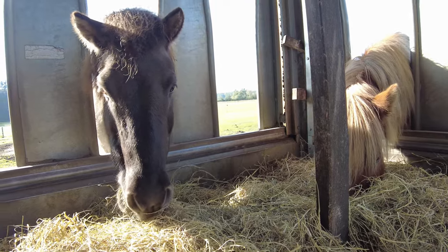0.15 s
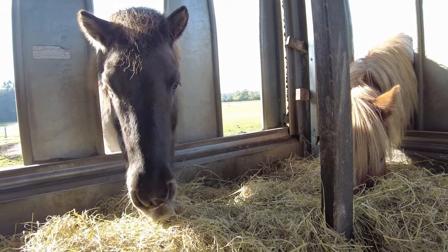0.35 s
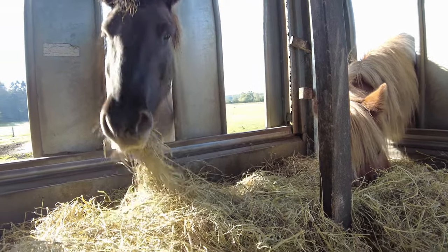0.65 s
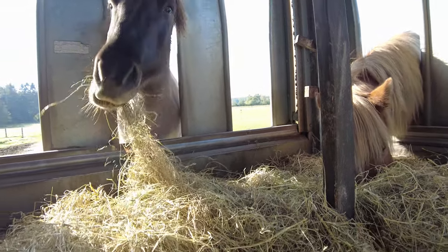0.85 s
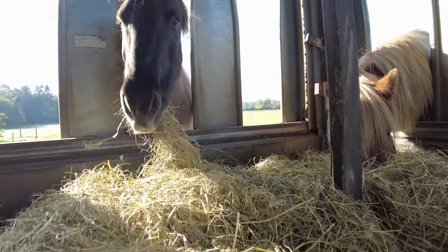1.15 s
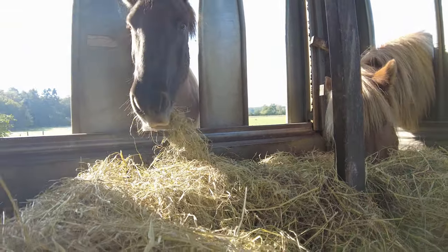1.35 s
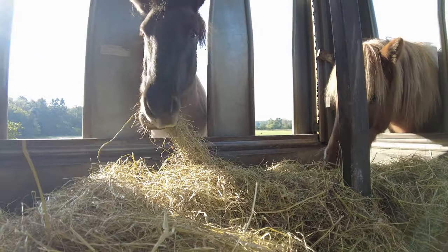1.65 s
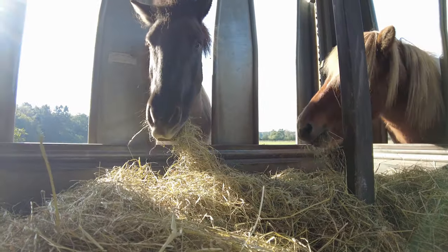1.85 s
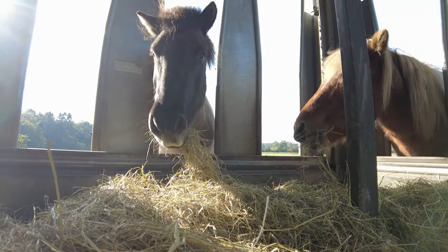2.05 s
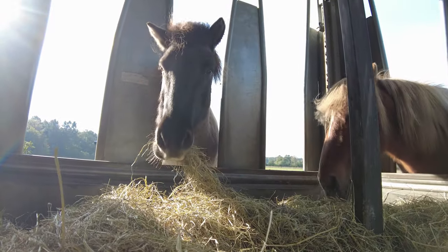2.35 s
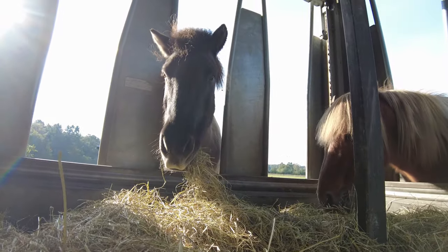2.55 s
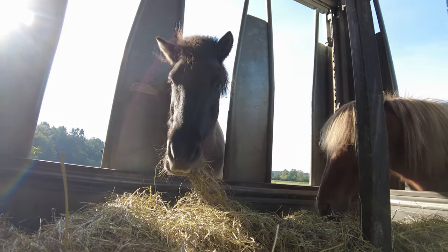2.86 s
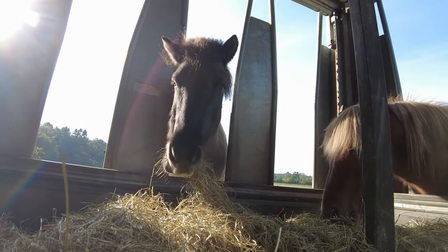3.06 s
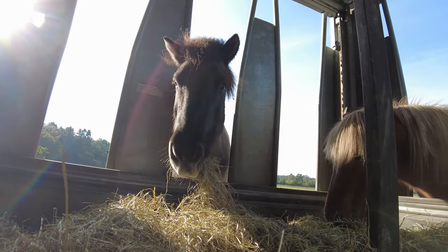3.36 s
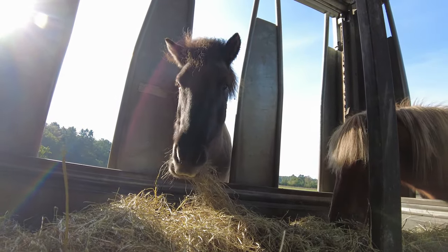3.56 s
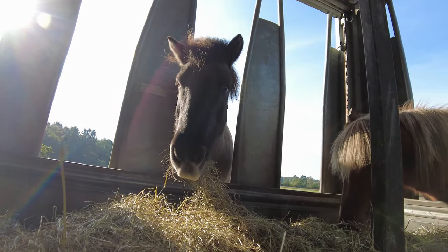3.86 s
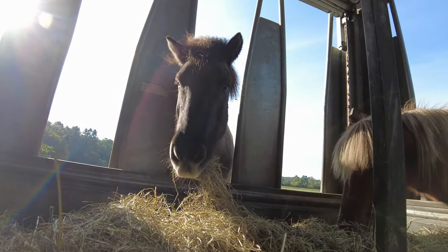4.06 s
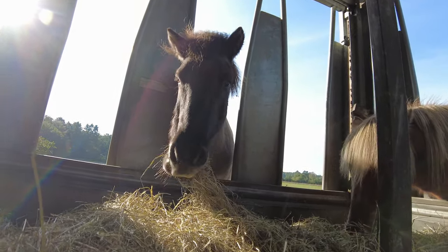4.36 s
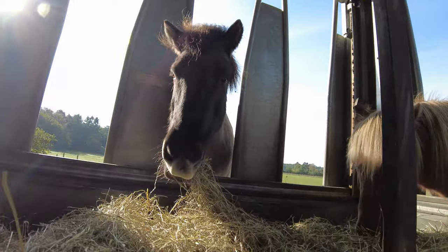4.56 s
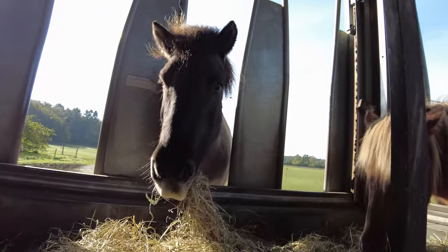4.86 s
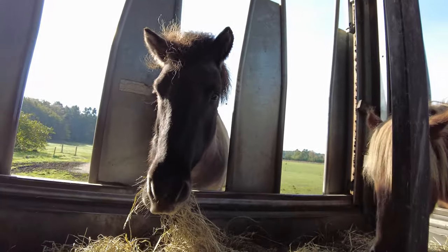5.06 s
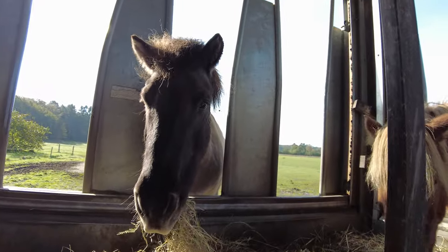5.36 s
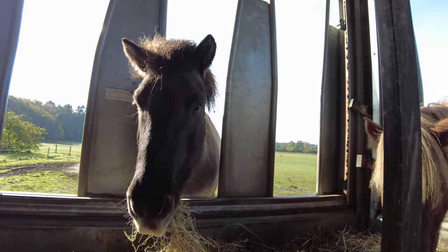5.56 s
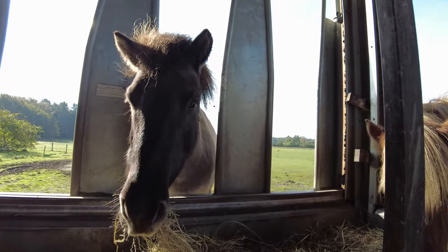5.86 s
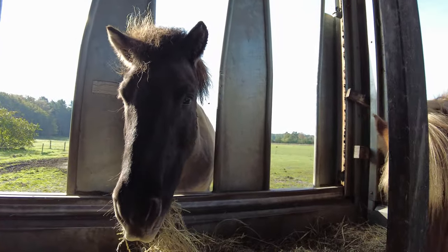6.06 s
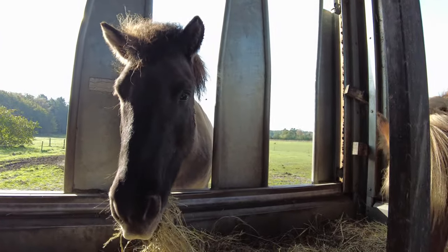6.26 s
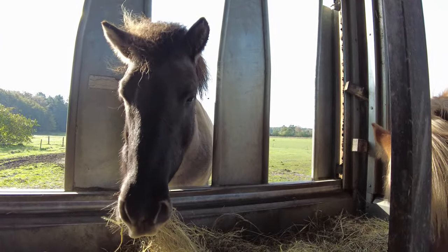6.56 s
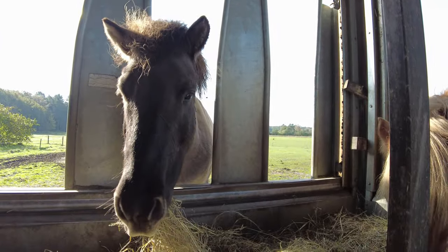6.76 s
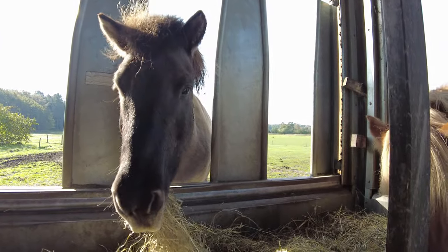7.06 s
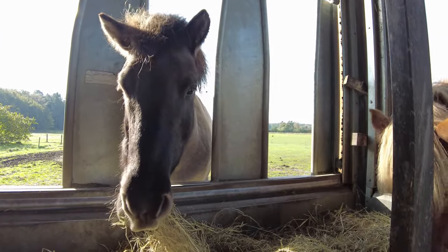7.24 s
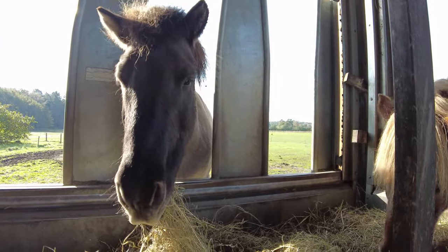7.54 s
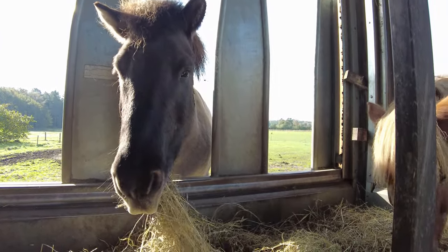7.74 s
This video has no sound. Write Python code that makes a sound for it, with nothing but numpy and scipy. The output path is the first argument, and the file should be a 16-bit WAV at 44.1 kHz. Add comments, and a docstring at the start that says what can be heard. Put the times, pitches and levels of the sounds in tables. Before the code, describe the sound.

Horses chew hay close to the microphone at a steel feeder outdoors. From the start and for about eight seconds, their jaws work at roughly four slightly uneven strokes a second. Each stroke combines a dull, hollow thud of molars with a gritty crunch, while dry stalks snap and loose hay rustles softly underneath. Light wind rumbles on the microphone, swelling around 0.5 seconds and easing by 2 seconds. From about 1 second, occasional soft mouth pops and tiny straw ticks join in, along with a few faint, thin bird chirps far away. A heavier chewing thud lands at about 4.6 seconds, followed by the loudest stalk snap near 5 seconds. The grinding carries on, with another heavy thud and a cluster of snaps around 7.5 seconds. The steel panels give the snaps a very short echo.

```python
"""Horses chew hay at a steel feeder in the open. From the start, about four jaw strokes a second:
molars slip and thud through the skull, stalks crunch and snap, loose hay rustles. Light wind on the
two microphone ports swells at 0.5 s and eases by 2 s. From 1 s on, mouths pop, dry straws tick and
faint far chirps pass. The heaviest thuds fall at 4.6 s and 7.5 s, the loudest snap between, near 5 s.
Throughout, the steel panels add short echoes."""
import sys
import numpy as np
from scipy import signal
from scipy.io import wavfile
from scipy.ndimage import uniform_filter1d

SR = 44100
rng = np.random.default_rng(int(sys.argv[2]) if len(sys.argv) > 2 else 0)


def store_pcm(level_fs):
    """Save levels as 16-bit WAV."""
    pcm = np.round(np.clip(level_fs, -1, 1) * 32767).astype(np.int16)
    wavfile.write(sys.argv[1], SR, np.atleast_2d(pcm).T)


N = 348390

# jaw strokes: t/s, rise/s, fall/s, skull/dB, dull crunch/dB, mid crunch/dB, bright crunch/dB,
# throat hollow/Hz, jaw rumble/dB, swish of hanging hay/dB
JAW_STROKES = [(0.01, 0.044, 0.013, -59, -42, -63, -65, 530, -42, -76),
               (0.22, 0.077, 0.095, -39.5, -64, -55, -60, 696, -59, -86),
               (0.36, 0.079, 0.12, -32.5, -43.5, -48, -50.5, 680, -54, -84),
               (0.59, 0.034, 0.023, -40, -48.5, -52, -53, 610, -39, -72),
               (0.8, 0.18, 0.14, -43, -76, -81, -72, 660, -50, -66),
               (1.07, 0.097, 0.08, -32.5, -56, -51, -55, 450.0, -65, -74),
               (1.25, 0.071, 0.12, -42, -56, -56.5, -55.5, 553, -53, -83),
               (1.38, 0.037, 0.1, -39, -48, -55.5, -56.5, 407, -49, -84),
               (1.49, 0.031, 0.025, -32, -57, -58, -60, 407, -48, -72),
               (1.69, 0.12, 0.084, -45, -45.5, -55, -57.5, 440, -66, -77),
               (1.87, 0.17, 0.14, -31.5, -48.5, -60.5, -59, 457, -51, -72),
               (2.1, 0.029, 0.093, -41, -49, -63, -66, 476, -61, -79),
               (2.48, 0.12, 0.13, -30.5, -45.5, -58, -55.5, 486, -48.5, -80),
               (2.8, 0.087, 0.077, -39.5, -46.5, -69, -64, 447, -49, -77),
               (3.18, 0.11, 0.086, -32.5, -43.5, -65, -56, 494, -51, -82),
               (3.54, 0.16, 0.082, -42, -50.5, -75, -66, 434, -53, -82),
               (3.86, 0.1, 0.082, -30.5, -42, -56, -50.5, 530, -48, -75),
               (4.06, 0.041, 0.049, -42, -55, -74, -62, 517, -63, -68),
               (4.22, 0.066, 0.13, -35.5, -54.5, -58.5, -66, 435, -46, -78),
               (4.48, 0.12, 0.11, -43, -53, -61.5, -63, 474, -65, -74),
               (4.63, 0.14, 0.054, -30, -55, -52, -58.5, 480, -45, -68),
               (4.95, 0.13, 0.12, -36.5, -56, -54.5, -59, 640, -63, -86),
               (5.31, 0.19, 0.1, -38, -50, -51.5, -61, 690, -63, -74),
               (5.63, 0.081, 0.066, -37.5, -45, -51.5, -55.5, 625, -48, -70),
               (5.99, 0.14, 0.11, -37, -47.5, -53.5, -59.5, 690, -45.5, -70),
               (6.28, 0.21, 0.2, -42, -55.5, -57, -64, 533, -48.5, -72),
               (6.56, 0.08, 0.064, -45, -56, -60, -79, 500.0, -56, -72),
               (6.79, 0.16, 0.22, -38, -47, -54, -56, 660.0, -44, -76),
               (7.2, 0.2, 0.13, -45, -53, -54.5, -70, 527, -62, -68),
               (7.49, 0.12, 0.078, -34.5, -48, -56, -57.5, 560, -50, -83),
               (7.64, 0.04, 0.05, -40, -49.5, -58, -66, 610.0, -54, -72),
               (7.82, 0.039, 0.061, -60, -46.5, -49, -64, 630, -57, -72)]
# stalks breaking: t/s, peak/dB, tilt/(dB/octave), mouth ring/Hz, t60/s
STALK_BREAKS = [(0.289, -34.5, 1, 1410, 0.03), (0.319, -31.5, 2, 717, 0.046), (0.374, -34, 2, 630, 0.026),
                (0.399, -35, 2, 640, 0.035), (0.578, -47, 2, 664, 0.03), (0.952, -38, 2, 1920, 0.033),
                (1.021, -46, 3, 1570, 0.031), (1.079, -40, -4, 1400, 0.027), (1.121, -41, 3.5, 1230, 0.035),
                (1.365, -35, 0, 1390, 0.035), (1.697, -37, 1.5, 1450, 0.035),
                (2.088, -33, -0.5, 800, 0.038), (2.375, -39.5, 4.5, 638, 0.032),
                (2.417, -40, 1.5, 626, 0.044), (2.431, -38, 5, 650, 0.031), (2.493, -31, 2, 626, 0.019),
                (2.53, -38, 2, 676, 0.035), (2.811, -37.5, 2.5, 1520, 0.035), (3.099, -41, 2.5, 813, 0.035),
                (3.183, -41, 4, 760, 0.045), (3.246, -37, -0.5, 775, 0.039), (3.486, -38, -1.5, 890, 0.044),
                (3.812, -34, 0.5, 630, 0.029), (4.216, -33.5, 1, 1390, 0.032),
                (4.433, -35.5, -4, 670, 0.035), (4.519, -45.5, 5, 1320, 0.035),
                (4.562, -40, 3, 1430, 0.039), (4.622, -34.5, 4.5, 1250, 0.032),
                (4.659, -40, 7, 1070, 0.029), (4.863, -45, 2, 1000, 0.031), (4.95, -22, -1.5, 850, 0.02),
                (5.214, -30.5, -2, 1420, 0.039), (5.278, -37.5, 1.5, 1420, 0.035),
                (5.307, -39, 5, 1270, 0.052), (5.327, -28.5, 2, 660, 0.033), (5.38, -35.5, 3, 705, 0.025),
                (5.915, -34, 1.5, 646, 0.041), (5.984, -30, 3, 1390, 0.035), (6.219, -38.5, 1, 745, 0.055),
                (6.503, -38, 0.5, 785, 0.039), (6.579, -35, -1, 1260, 0.05), (6.736, -39, 3, 708, 0.044),
                (6.774, -36.5, 3, 1340, 0.035), (7.091, -34, -0.5, 1300, 0.042),
                (7.138, -40, -1, 1300, 0.032), (7.198, -30, -1, 1510, 0.037), (7.276, -37, 3, 830, 0.037),
                (7.428, -31.5, -1, 790, 0.033), (7.448, -36, 1.5, 790, 0.03),
                (7.49, -33.5, 2.5, 1290, 0.035), (7.518, -30.5, 0, 1260, 0.042),
                (7.619, -40, 3, 780, 0.055), (7.738, -38, 3.5, 1260, 0.038), (7.81, -35, -2, 1430, 0.035),
                (7.827, -37, 1, 1280, 0.042)]
# spectrum of wind eddies and jaw rumble: f/Hz, level/dB
LOW_SPECTRUM = [(30, -27), (60, 15.5), (80, 3.5), (120, -1.5), (160, -5), (300, -48.5)]


def grinding():
    """Small slips ring the skull; crushed stalks crunch through the hollows of the moving mouth."""
    skull_modes = [(238.1, 57.3, -1), (255.6, 31.4, -0.5), (279.9, 41.6, -1)]  # f/Hz, width/Hz, level/dB
    dull_spectrum = [(60, -12), (150, -19), (380, 1), (600, -11.5), (850, -6), (1100, -15), (1500, -44.5)]  # f/Hz, level/dB
    bright_spectrum = [(1300, -13), (1800, 21), (2600, 6), (3100, 11.5), (4200, -2.5), (7000, -23),
                       (12000, -45)]  # f/Hz, level/dB
    floors_db = [-47.5, -59, -74.5, -78]  # between strokes: skull/dB, dull/dB, mid/dB, bright/dB
    lips_open_hz, lips_shut_hz = 2920, 2590  # hollow behind the lips
    times_s, _, _, *levels_db, hollow_hz, rumble_db, _ = np.transpose(JAW_STROKES)
    throat_hz = np.interp(np.arange(N) / SR, times_s, hollow_hz)
    closure = np.minimum(jaw_gain(np.zeros(len(times_s)), -60), 1)
    lips_hz = lips_open_hz + (lips_shut_hz - lips_open_hz) * closure
    slips = crackle(250, 0.42, 0.58, 0.0025)
    skull = np.zeros(N)
    for hz, width_hz, db in skull_modes:
        band = signal.butter(2, [hz - width_hz / 2, hz + width_hz / 2], "bandpass", fs=SR, output="sos")
        skull += gain_of(db) * signal.sosfilt(band, slips * flutter(30, 1.6))
    pressure = flutter(14.7, 2.55) * sticking()
    dull = coloured(crackle(200, 2.4, 0.92, 0.0092) * pressure, dull_spectrum)
    dull += gain_of(6.5) * resonate(dull, throat_hz * flutter(19, 1), width_hz=66)
    mid = crackle(90, 1, 1, 0.0037) * pressure
    mid = resonate(mid, 1330 * flutter(9.3, 0.67), width_hz=160)
    mid = resonate(mid, 1500, width_hz=600)
    bright = coloured(crackle(200, 2.4, 0.8, 0.002) * pressure, bright_spectrum)
    bright += gain_of(7.5) * resonate(bright, lips_hz * flutter(29, 0.57), width_hz=210)
    out = jaw_gain(rumble_db, -92) * unit_rms(coloured(slips, LOW_SPECTRUM))
    for db, floor_db, layer in zip(levels_db, floors_db, (skull, dull, mid, bright)):
        out += jaw_gain(db, floor_db) * unit_rms(layer)
    return out


def jaw_gain(levels_db, floor_db):
    """Each stroke builds, holds and lets go at its own level; powers add over a steady floor."""
    ends_db, squareness = -10, 1.87
    peak_s, rise_s, fall_s = np.transpose(JAW_STROKES)[:3, :, None]
    t = np.arange(0, N + 64, 64) / SR
    from_peak = np.where(t < peak_s, (peak_s - t) / rise_s, (t - peak_s) / fall_s)
    pressure = gain_of(ends_db * np.minimum(from_peak, 5) ** squareness)
    power = gain_of(floor_db) ** 2 + ((gain_of(levels_db)[:, None] * pressure) ** 2).sum(0)
    return np.interp(np.arange(N) / SR, t, np.sqrt(power))


def sticking():
    """Teeth stick on a stalk just before it breaks: the crunch gain dips."""
    hush_db, dip_db = np.zeros(N), np.linspace(0, -7, 600)
    for s, *_ in STALK_BREAKS:
        add(hush_db, s - len(dip_db) / SR, dip_db)
    return gain_of(uniform_filter1d(hush_db, size=40))


def molar_thuds():
    """Each strong slip rings the skull briefly, over a low push of the jaw."""
    strong_slips = [(0.202, -24.5, 277, 0.11), (0.255, -27, 262, 0.065), (0.296, -27.5, 266, 0.036),
                    (0.323, -19.5, 223.5, 0.2), (0.374, -21, 274, 0.086), (0.404, -30, 261, 0.12),
                    (0.424, -21.5, 246, 0.082), (0.774, -36, 286, 0.13), (0.81, -30, 278, 0.12),
                    (0.954, -27.5, 254, 0.084), (1.063, -33.5, 245, 0.081), (1.122, -17.5, 250, 0.1),
                    (1.224, -25.5, 231, 0.037), (1.361, -28.5, 314, 0.073), (1.48, -25, 279, 0.06),
                    (1.627, -32, 282, 0.094), (1.709, -24, 278, 0.059), (1.769, -24.5, 292, 0.15),
                    (1.82, -20.5, 264, 0.093), (1.899, -32, 270, 0.065), (1.943, -22, 269, 0.095),
                    (1.978, -30, 254, 0.048), (2.097, -26.5, 307, 0.032), (2.367, -28.5, 271, 0.098),
                    (2.392, -26.5, 280, 0.08), (2.44, -19.5, 272, 0.04), (2.476, -20, 257, 0.074),
                    (2.489, -16, 274, 0.032), (2.554, -21.5, 270, 0.052), (2.661, -31, 240, 0.042),
                    (2.731, -29, 234, 0.086), (2.765, -28.5, 293, 0.049), (2.829, -29.5, 273, 0.054),
                    (3.088, -31.5, 239, 0.11), (3.148, -19, 233, 0.054), (3.192, -20, 272, 0.049),
                    (3.248, -23.5, 266, 0.075), (3.585, -28.5, 214.4, 0.14), (3.773, -24.5, 217, 0.16),
                    (3.831, -22, 214, 0.056), (3.842, -21.5, 258, 0.028), (3.888, -17, 302, 0.048),
                    (3.943, -17.5, 235, 0.035), (4.053, -30.5, 256, 0.04), (4.22, -22, 224, 0.084),
                    (4.436, -24.5, 242, 0.15), (4.523, -26.5, 248, 0.046), (4.549, -29, 228, 0.11),
                    (4.622, -18, 256, 0.076), (4.636, -11, 234, 0.051), (4.661, -19, 238, 0.037),
                    (4.757, -32.5, 282, 0.056), (4.916, -23.5, 283, 0.057), (4.983, -30, 279, 0.072),
                    (5.233, -27.5, 234, 0.15), (5.29, -20, 240, 0.11), (5.328, -20.5, 238, 0.074),
                    (5.378, -27.5, 220, 0.065), (5.591, -32, 240, 0.076), (5.926, -22.5, 244, 0.077),
                    (6.021, -18, 243, 0.071), (6.077, -21, 220, 0.046), (6.328, -32.5, 275, 0.065),
                    (6.586, -28, 293, 0.083), (6.69, -22.5, 245, 0.082), (6.749, -26, 231, 0.061),
                    (6.779, -23.5, 217, 0.073), (6.928, -32, 221, 0.073), (7.276, -26, 262, 0.081),
                    (7.4, -30, 260, 0.088), (7.435, -24, 269, 0.071), (7.489, -19, 258, 0.041),
                    (7.521, -9.5, 231, 0.065), (7.548, -21, 220, 0.053), (7.617, -30.5, 231, 0.072),
                    (7.814, -32, 305, 0.039)]  # t/s, level/dB, ring/Hz, t60/s
    skull_response = [(60, -3.5), (120, 1.5), (165, -12.5), (205, -1.5), (300, 0.5), (360, -7.5), (600, 1)]  # f/Hz, gain/dB
    out, t = np.zeros(N), np.arange(8000) / SR
    push = gain_of(-19) * np.sin(2 * np.pi * 115 * t) * gain_of(-60 * t / 0.051)
    for s, db, hz, t60_s in strong_slips:
        ring = soft_decay(t, 0.0013, t60_s) * np.sin(2 * np.pi * (hz * t + rng.random()))
        add(out, s, gain_of(db) * (ring + push))
    return coloured(out, skull_response)


def stalk_snaps():
    """Each break is a tick and a burst of tearing fibres, ringing briefly in the mouth."""
    stalk_spectrum = [(300, 1.5), (550, 0.5), (750, 1), (1080, -8.5), (1300, 1), (1700, -12.5), (2500, -6),
                      (3200, -14.5), (4500, -19.5), (9000, -42)]  # f/Hz, level/dB
    out, t = np.zeros(N), np.arange(4000) / SR
    tick = -1.31 * np.exp(-t / 0.0002)
    for s, db, tilt_db, hz, t60_s in STALK_BREAKS:
        spectrum = [(f, level + tilt_db * np.log2(f / 1000)) for f, level in stalk_spectrum]
        fibres = np.sign(rng.standard_normal(len(t)))
        tear = fibres * gain_of(-60 * t / t60_s) * (1 - np.exp(-t / 0.0024))
        snap = coloured(tear + tick, spectrum)
        snap += gain_of(8) * resonate(snap, hz, width_hz=80)
        envelope_peak = np.sqrt(2 * uniform_filter1d(snap ** 2, size=130).max())
        add(out, s, gain_of(db) * snap / envelope_peak)
    return out


def mouth_pops():
    """Soft, short rings of the mouth hollow."""
    pops = [(1.059, -36, 379), (1.371, -33, 408), (1.475, -38, 385), (1.694, -36, 371), (1.85, -46, 444),
            (2.092, -30.5, 378), (2.488, -33.5, 431), (2.809, -41.5, 366), (3.246, -38.5, 398),
            (3.498, -36.5, 419), (5.649, -47, 409), (7.114, -40, 400), (7.827, -43, 450)]  # t/s, peak/dB, f/Hz
    out, t = np.zeros(N), np.arange(6000) / SR
    envelope = soft_decay(t, rise_s=0.0026, t60_s=0.06)
    for s, db, hz in pops:
        add(out, s, gain_of(db) * envelope * np.sin(2 * np.pi * hz * t))
    return out


def hay_rustle():
    """Dry stalks rub: fine hiss stirred by each stroke, brighter fizz from hay pulled close by."""
    sliding = [(0.0, -63.5, -68), (0.4, -61.5, -70), (0.77, -60, -54.5), (0.99, -62, -72),
               (1.1, -59.5, -65.5), (1.34, -63, -74), (1.61, -61, -58), (1.91, -62.5, -65.5),
               (2.11, -65, -70), (2.77, -67.5, -73.5), (3.06, -66, -75), (3.14, -64, -69), (3.43, -67, -75),
               (3.61, -66, -70.5), (3.74, -70.5, -82), (3.85, -63, -71), (3.94, -64.5, -71.5),
               (4.49, -67.5, -73), (4.62, -64, -75), (4.8, -65.5, -72.5), (5.96, -62.5, -72),
               (6.14, -65, -72), (6.58, -62.5, -63.5), (7.0, -63.5, -72), (7.22, -63.5, -63),
               (7.44, -60.5, -60), (7.77, -63, -63), (7.9, -63, -71)]  # t/s, hiss/dB, fizz/dB
    hiss_spectrum = [(400, 2), (800, 7.5), (1150, 4.5), (1300, 12), (2000, 4), (3000, 4.5), (5000, 1.5),
                     (7000, -5.5), (8000, -8), (10000, -17), (16000, -21)]  # f/Hz, level/dB
    fizz_spectrum = [(2500, -21.5), (4000, -5), (6000, 0.5), (8000, 0.5), (10000, -1), (12000, -4.5),
                     (14500, -5), (15800, -21)]  # f/Hz, level/dB
    hiss_db, fizz_db = curves(sliding)
    swish_db = np.transpose(JAW_STROKES)[-1]
    stir = jaw_gain(np.full(len(JAW_STROKES), -2.5), floor_db=0)
    hiss = unit_rms(coloured(crackle(380, 2, 4.2, 0.00066), hiss_spectrum))
    hiss *= gain_of(hiss_db + 5) * stir
    fizz = unit_rms(coloured(crackle(380, 2.3, 8.4, 0.00082), fizz_spectrum))
    fizz *= np.hypot(gain_of(fizz_db), jaw_gain(swish_db, floor_db=-88))
    return flutter(4.5, 0.15) * (hiss + fizz)


def straw_ticks():
    """Dry straws tick, each a very short high ring."""
    ticks = [(1.3274, -50, 5070), (1.3982, -51, 5460), (2.2373, -49, 5560), (2.3047, -55, 6390),
             (2.7576, -54, 6160), (3.3233, -52, 5400), (3.3424, -50, 5390), (4.8075, -49, 6090),
             (6.6912, -49, 9350), (7.877, -53, 7990)]  # t/s, peak/dB, f/Hz
    t60_s = 0.0082
    out, t = np.zeros(N), np.arange(400) / SR
    for s, db, hz in ticks:
        add(out, s, gain_of(db - 60 * t / t60_s) * np.sin(2 * np.pi * hz * t))
    return out


def wind():
    """Wind on the ports: lumpy rumble under the flapping of quicker eddies."""
    gusts = [(0.0, -53, -52), (0.48, -41.5, -45), (0.88, -45, -56), (1.43, -40, -47), (1.63, -42.5, -51),
             (2.24, -51, -55), (2.62, -53, -52.5), (3.17, -59, -49.5), (3.65, -44.5, -49),
             (4.16, -53.5, -51.5), (4.66, -48, -49), (6.47, -54, -55.5), (6.78, -57, -46.5),
             (7.08, -50, -49.5), (7.5, -56, -52), (7.9, -59, -58)]  # t/s, rumble/dB, flapping/dB
    gust_spectrum = [(12, -17), (20, 11), (32, 25), (45, 14), (60, -2.5), (90, -39.5)]  # f/Hz, level/dB
    rumble_db, flapping_db = curves(gusts)
    rumble = unit_rms(coloured(rng.standard_normal(N) * flutter(16, 1.4), gust_spectrum))
    flapping = unit_rms(coloured(crackle(40, 4.4, 1, 0.002), LOW_SPECTRUM))
    return gain_of(rumble_db) * rumble + gain_of(flapping_db) * flapping


def far_chirps():
    """Thin, husky whistles: noise in a gliding resonance."""
    chirps = [(1.017, 0.035, 3150, 2980, -51.5), (1.724, 0.06, 4360, 3430, -58),
              (2.013, 0.045, 4170, 4350, -62), (2.96, 0.067, 3370, 3150, -66),
              (3.01, 0.049, 4100, 3700, -69), (4.86, 0.096, 3240, 3900, -62),
              (5.763, 0.076, 2820, 3200, -62), (5.815, 0.13, 3640, 3850, -63),
              (5.853, 0.055, 3100, 2920, -64), (7.35, 0.094, 4200, 3500, -62)]  # t/s, length/s, start/Hz, end/Hz, level/dB
    out = np.zeros(N)
    for s, length_s, start_hz, end_hz, db in chirps:
        size = round(length_s * SR)
        noise = rng.standard_normal(8000)[:size]
        whistle = resonate(noise, np.linspace(start_hz, end_hz, size), width_hz=170)
        add(out, s, gain_of(db) * unit_rms(whistle) * np.hanning(size) ** 0.13)
    return out


def panel_echoes(x):
    """Steel panels add a short tail: one echo of random sign per 20 samples."""
    t60_s, tail_db = 0.13, -6.5
    taps = np.zeros(8000)
    slots = np.arange(100, len(taps) - 20, 20)
    echoes = rng.choice([-1., 1.], len(slots)) * gain_of(-60 * slots / SR / t60_s)
    taps[slots + rng.integers(0, 20, len(slots))] = echoes
    return x + gain_of(tail_db) * signal.oaconvolve(x, taps / np.linalg.norm(taps))[:N]


def stereo_width(x):
    """Stereo width of the microphone pair: wide near 1 kHz, narrowing abruptly above 1.2 kHz."""
    side_spectrum = [(40, -28), (90, -20), (200, -13.5), (300, -5.5), (450, -4.5), (800, 2), (1000, 1.5),
                     (1170, 10), (1230, -10), (1600, -5), (2500, -1.5), (4500, 0), (8000, -3.5),
                     (15000, -4.5)]  # f/Hz, side re mid/dB
    hz, _, mid_bins = signal.stft(x, SR, nperseg=512, noverlap=384)
    drift = rng.standard_normal(mid_bins.shape[::-1]).T
    drift = uniform_filter1d(drift, size=5, axis=0)  # over frequency
    drift = unit_rms(uniform_filter1d(drift, size=7, axis=1))  # over time
    wander = 1.3j * np.sin(1.55 * drift) + 0.29 * drift[:, ::-1]  # phase and level between channels
    side_bins = mid_bins * gain_of(spectrum_db(side_spectrum, hz))[:, None] * wander
    side = signal.istft(side_bins, SR, nperseg=512, noverlap=384)[1][:N]
    return np.array([x + side, x - side])


def crackle(per_s, spread_db, hiss, burst_s):
    """Random short noise bursts, a few of them large, over a share of even hiss."""
    sizes = gain_of(spread_db * np.minimum(rng.exponential(1, N), 3.5))
    onsets = rng.random(N) < per_s / SR
    pole = np.exp(-1 / (burst_s * SR))
    bursts = signal.lfilter([1], [1, -2 * pole, pole ** 2], sizes * onsets)  # each swells and fades
    return (unit_rms(bursts) + hiss) * rng.standard_normal(N)


def flutter(rate_hz, depth_db):
    """Random factor around 1, low-passed at rate_hz."""
    drift = signal.sosfilt(signal.butter(2, rate_hz, fs=SR, output="sos"), rng.standard_normal(N))
    return gain_of(depth_db * unit_rms(drift))


def soft_decay(t, rise_s, t60_s):
    """Envelope with a soft start, peak 1."""
    shape = (1 - np.exp(-t / rise_s)) ** 2 * gain_of(-60 * t / t60_s)
    return shape / shape.max()


def resonate(x, hz, width_hz):
    """Unity-gain resonance, steady or moving: shift hz to zero, smooth, shift back."""
    carrier = np.exp(2j * np.pi * np.cumsum(hz * np.ones(len(x))) / SR)
    pole = np.exp(-np.pi * width_hz / SR)
    return 2 * (carrier * signal.lfilter([1 - pole], [1, -pole], x / carrier)).real


def coloured(x, spectrum):
    """Minimum-phase filter: clicks keep a sharp front."""
    log_gain = spectrum_db(spectrum, abs(np.fft.fftfreq(8192, 1 / SR))) * np.log(10) / 20
    taps = np.fft.ifft(np.exp(np.conj(signal.hilbert(log_gain)))).real[:4096]
    return signal.oaconvolve(x, taps)[:len(x)]


def spectrum_db(points, hz):
    """Level at hz, interpolated over log frequency."""
    f, db = np.transpose(points)
    return np.interp(np.log(hz + 1), np.log(f + 1), db)


def curves(rows):
    """Columns of a timed table, interpolated per sample."""
    s, *columns = np.transpose(rows)
    return [np.interp(np.arange(N) / SR, s, column) for column in columns]


def add(mix, s, sound):
    """Mixes a sound in at s seconds."""
    part = mix[round(s * SR):][:len(sound)]
    part += sound[:len(part)]


def gain_of(db):
    """Decibels to gain."""
    return 10 ** (np.asarray(db) / 20)


def unit_rms(x):
    """Scales to rms 1."""
    return x / np.sqrt(np.mean(x ** 2) + 1e-20)


def scene():
    """Chewing, hay, chirps and wind at the two ports."""
    echoed = panel_echoes(stalk_snaps() + mouth_pops() + straw_ticks() + far_chirps())
    return stereo_width(grinding() + molar_thuds() + echoed + hay_rustle() + wind())


def record(dry):
    """Band limit of the recorder."""
    cutoff_hz = 15730
    lowpass = signal.firwin(1023, cutoff_hz, window=("kaiser", 9), fs=SR)
    return signal.oaconvolve(dry, lowpass[None], "same")


dry = scene()
out = record(dry)
store_pcm(out)
```